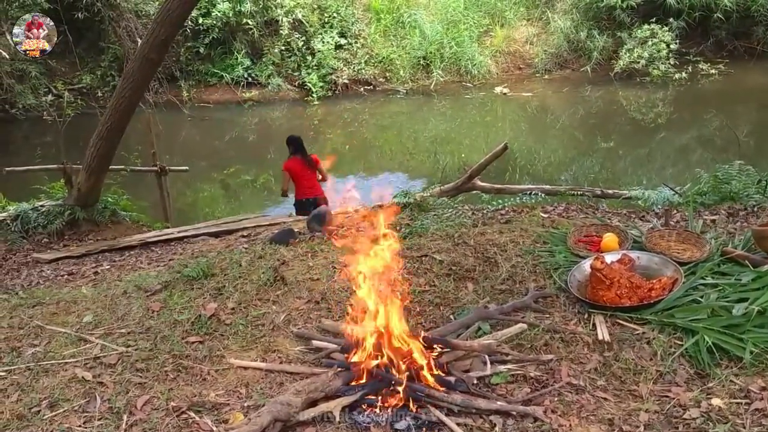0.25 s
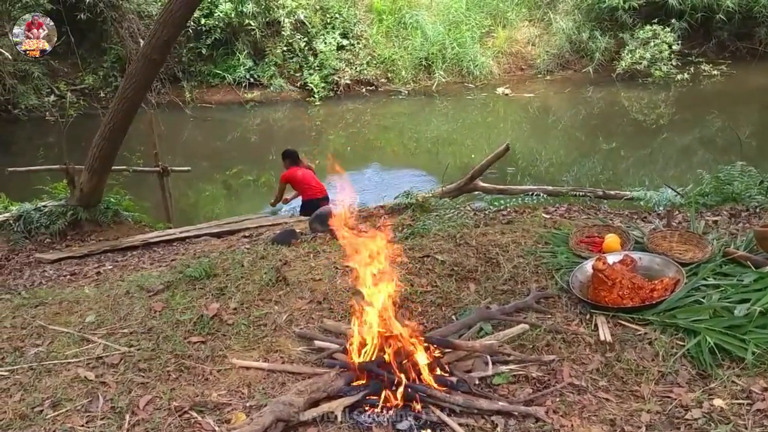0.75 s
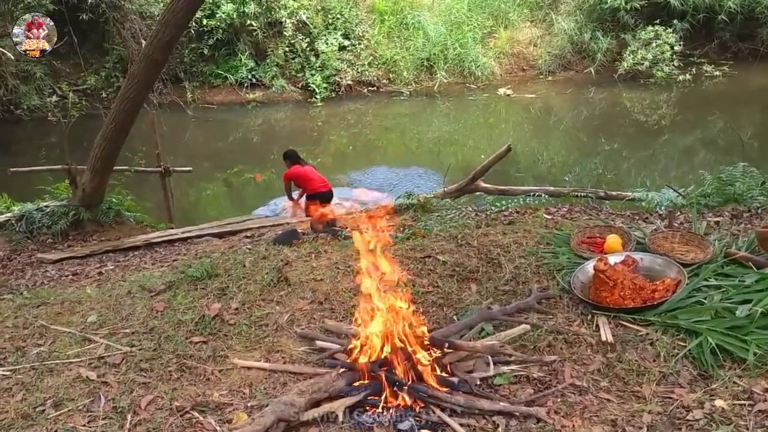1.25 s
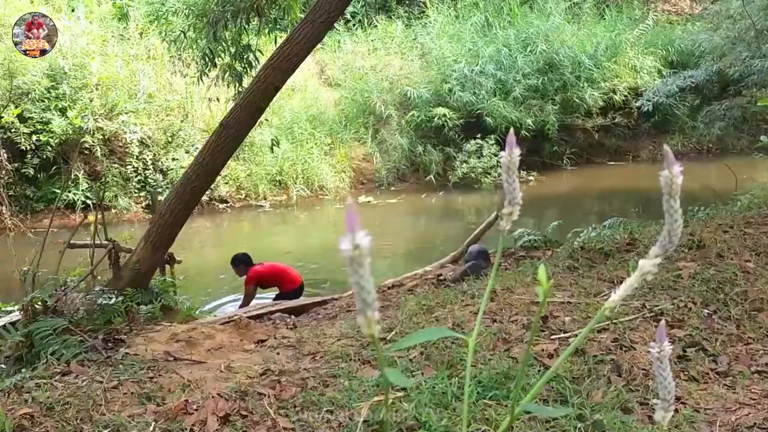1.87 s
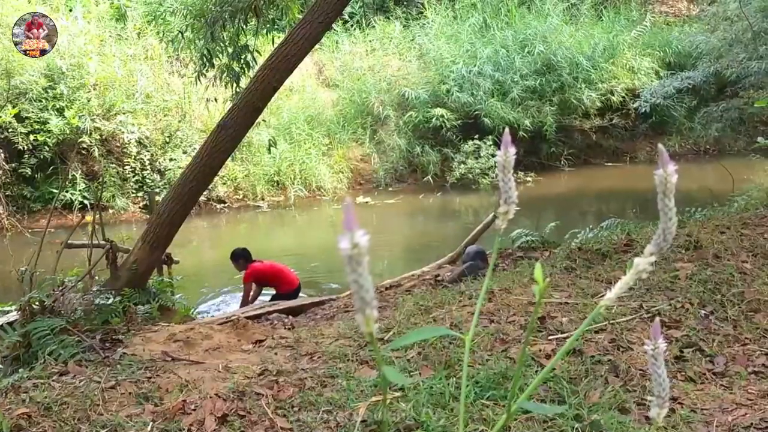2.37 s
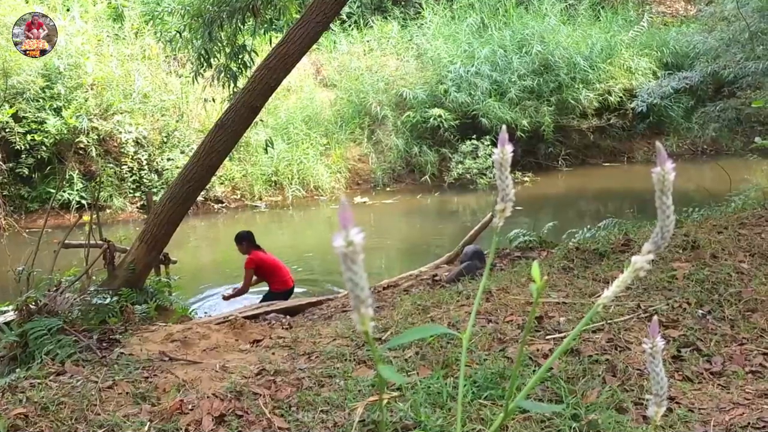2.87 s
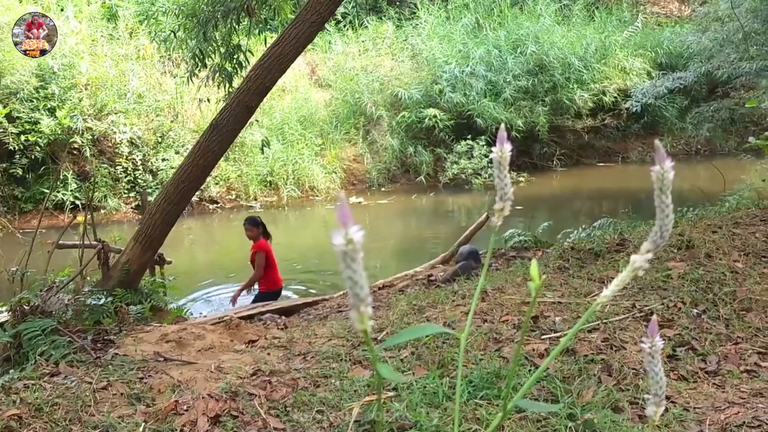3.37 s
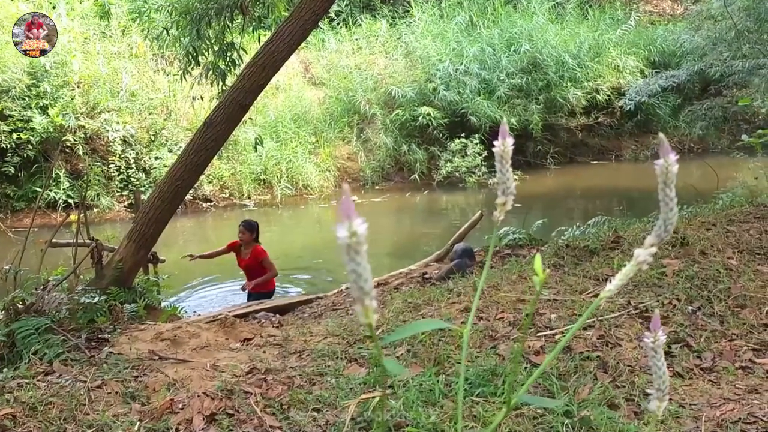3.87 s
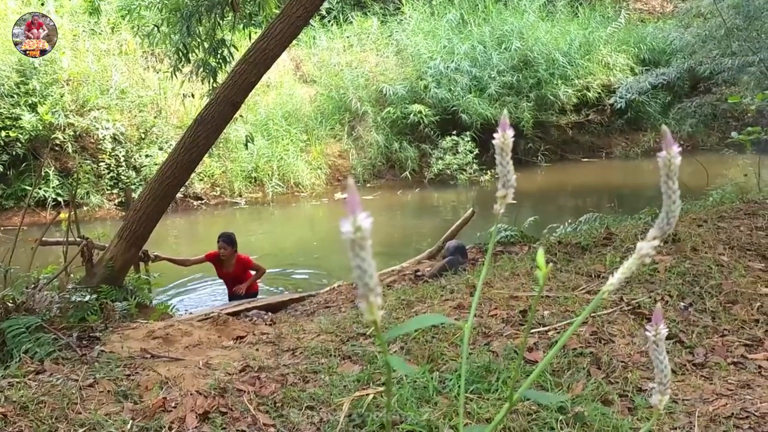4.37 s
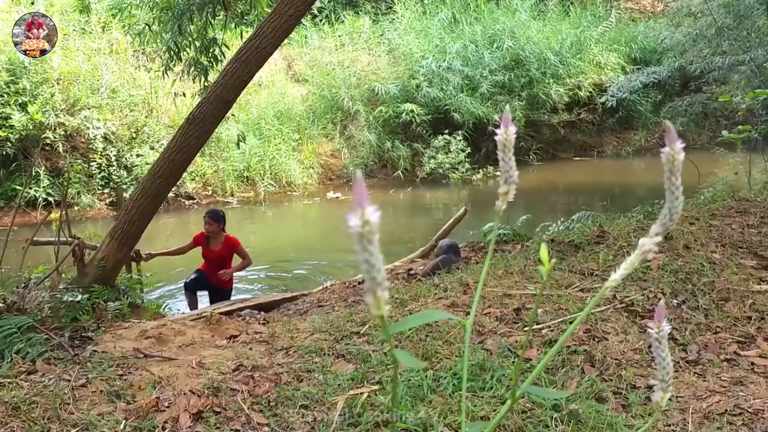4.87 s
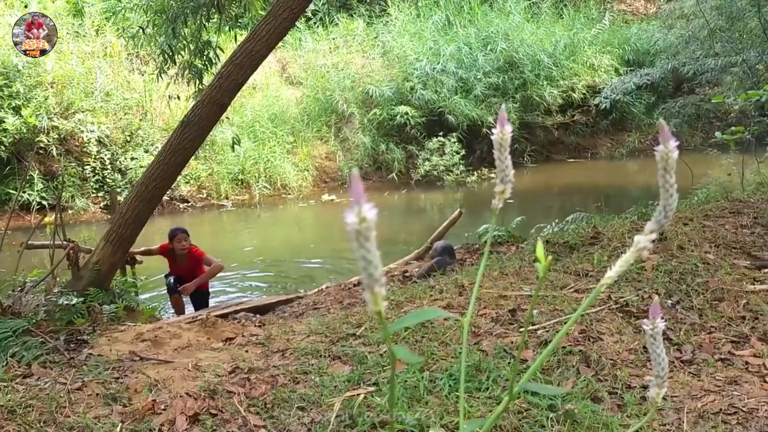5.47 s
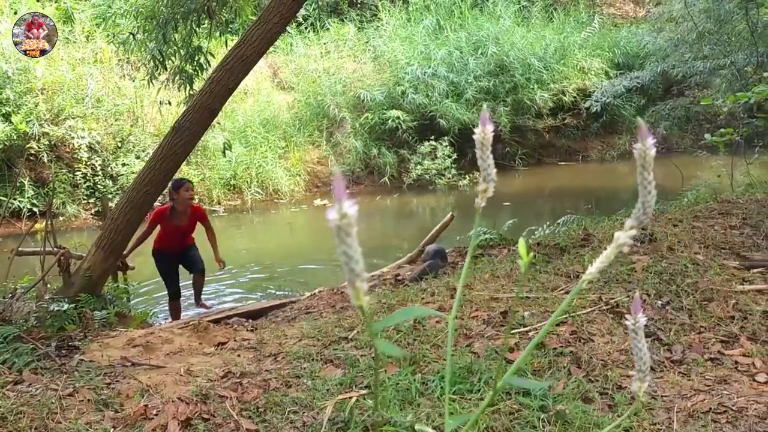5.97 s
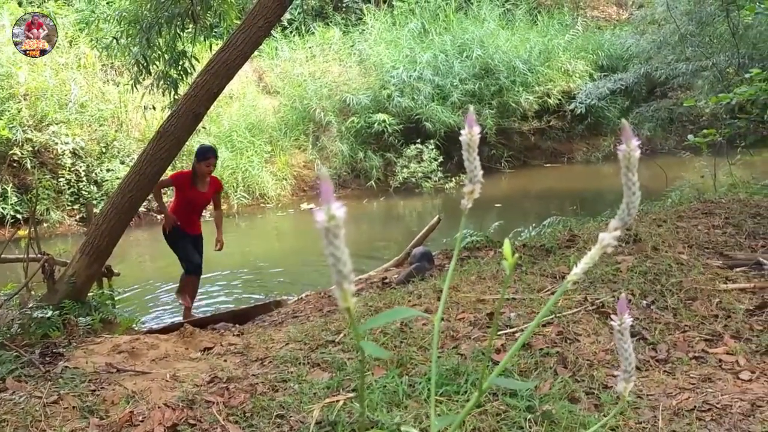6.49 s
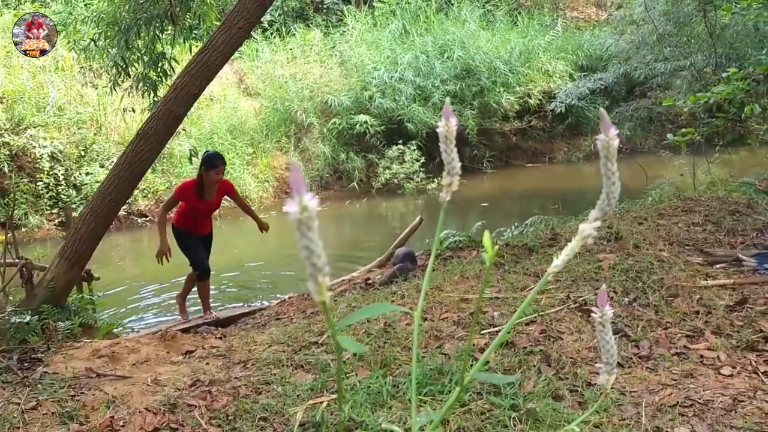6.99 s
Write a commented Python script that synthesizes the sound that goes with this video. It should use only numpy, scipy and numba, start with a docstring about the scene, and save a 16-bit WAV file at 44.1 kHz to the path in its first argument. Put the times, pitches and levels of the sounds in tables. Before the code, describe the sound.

A distant cicada whine over low fire rumble jumps to a dense, piercing insect chorus by a stream, with faint wading and bird chirps.

```python
"""In the trees above a forest stream a cicada chorus shrills: first far off beside a rumbling campfire,
then close on the bank. Noise and click trains ringing in tymbal resonances make the singers.
Someone wades in the shallows: swishes and sloshes of noise, plops and drops of ringing bubbles,
soft thuds and a creaking log of dying tones. Patchy low noise is the fire, then wind at the microphone ports;
a bird chirps, a hum comes and goes and the stream babbles faintly."""
import sys
import numpy as np
from scipy import signal
from scipy.fft import rfft, irfft, next_fast_len
from scipy.io import wavfile
from scipy.ndimage import uniform_filter1d
from numba import njit

SR = 44100
rng = np.random.default_rng(int(sys.argv[2]) if len(sys.argv) > 2 else 0)


def unload_audio(sound):
    """Save the sound as a 16-bit wav file, at the path given as the first command line argument."""
    columns = np.transpose(np.atleast_2d(sound))
    # keep every value between -1 and 1, then stretch to whole-number steps
    steps = np.round(np.clip(columns, -1, 1) * 32767)
    wavfile.write(sys.argv[1], SR, steps.astype(np.int16))


N = 318843
TIME = np.arange(N) / SR
MOVE_S = (1.9, 2.09)   # the listener goes from fire to bank

# Level of the blended mass. Each row: time in seconds, level in dB.
MASS_LEVEL = [(0.0, -52.5), (0.12, -66), (0.3, -70), (0.34, -58.5), (1.93, -57.5), (2.25, -43), (3.6, -42),
              (6.7, -40.5), (7.23, -41.5)]
# Tone of the mass heard from the fire. Each row: frequency in Hz, relative level in dB per Hz.
MASS_FAR = [(1760, -54), (3000, -30), (3760, -28.5), (4600, -19.5), (5200, -16), (5750, -23), (6300, -13),
            (6750, -15), (7350, -8.5), (8400, -16.5), (8650, -24.5), (10500, -35), (13600, -81),
            (22000, -120)]
# Tone of the mass heard from the bank. Each row: frequency in Hz, relative level in dB per Hz.
MASS_NEAR = [(1760, -63), (3000, -36.5), (3300, -31.5), (3800, -23), (4590, -7), (5400, -2), (6250, -2),
             (7510, -2), (7950, -1.5), (10000, -26.5), (10500, -47), (13600, -74), (22000, -120)]
CLICK_SHARE, MASS_UNSTEADY = 0.5, .003   # power share of audible click trains; spread of their rate as a share


def blended_mass():
    """Countless singers merge into noise, with a few click trains still heard in it."""
    white = rng.standard_normal((2, 2, N))
    rates = rng.uniform(380, 470, size=4)   # clicks per s
    trains = sum(tymbal_clicks(np.full(N, per_s), MASS_UNSTEADY) for per_s in rates)
    voices = np.sqrt(1 - CLICK_SHARE) * white + np.sqrt(CLICK_SHARE) * rms_one(forest(trains))
    near = during_move([0, 1])
    mass = np.sqrt(1 - near) * coloured(voices[0], MASS_FAR)
    mass = mass + np.sqrt(near) * coloured(voices[1], MASS_NEAR)
    return pan(mass * from_db(level_curve(MASS_LEVEL) + 0.47 * drift(2.7)), 0.66)


# Tone of the chorus overtones. Each row: frequency in Hz, relative level in dB per Hz.
OVERTONES = [(5290, -30), (9000, -12.5), (10300, -21.5), (12000, -13), (15100, -15), (15800, -8.5)]
OVERTONE_DB, OVERTONE_SWELL_DB_PER_S = (-71.5, -62.5), 0.57   # at the fire, on reaching the bank; then growing


def overtones():
    """The fizz on top of the chorus: flickering noise that keeps swelling on the bank."""
    on_bank_s = np.maximum(TIME - MOVE_S[1], 0)
    level_db = during_move(OVERTONE_DB) + OVERTONE_SWELL_DB_PER_S * on_bank_s
    fizz = coloured(rng.standard_normal((2, N)), OVERTONES)
    return pan(fizz * from_db(level_db + 1.4 * drift(30)), 1.0)


PHRASE_RISE_DB_PER_S, PHRASE_FALL_DB_PER_S, PHRASE_PAN_DB = 40, 35, 1   # slopes of a phrase one second long
TYMBAL_WIDTH_HZ = 350
# Phrases of small groups that stand out near the bank. Each row: start in seconds, length in seconds,
# level in dB, tymbal resonance in Hz at the start, tymbal resonance in Hz at the end.
PHRASES = [(1.98, .55, -50, 6480, 6150), (1.98, .4, -52, 5850, 5900), (2.1, .9, -54, 4830, 4720),
           (2.2, 1.0, -54, 5350, 5300), (2.47, .5, -47, 5900, 5770), (2.05, 1.6, -50.5, 7250, 7340),
           (2.2, 1.3, -54, 7700, 7700), (2.75, .65, -49.5, 6800, 6570), (3.05, .45, -51, 5740, 5500),
           (3.3, .5, -52, 6400, 6100), (3.55, .95, -49, 6750, 6540), (3.8, .12, -47, 5360, 5320),
           (3.8, .12, -53, 4460, 4450), (3.9, 1.1, -46, 7470, 7500), (3.95, .6, -55, 8350, 8300),
           (4.1, .7, -50.5, 5270, 5220), (4.6, 1.0, -49.5, 6560, 6720), (4.6, 2.3, -49, 7680, 7800),
           (4.8, .9, -49.5, 5600, 5750), (5.2, 2.1, -53, 4800, 4680), (5.1, 1.0, -49, 7500, 7530),
           (5.1, 1.2, -56, 8300, 8350), (5.4, 1.9, -49, 5520, 5480), (5.7, 1.6, -48.5, 6800, 7050),
           (6.2, 1.1, -49, 5780, 6100)]


def groups():
    """Small groups take turns to stand out of the mass, once the listener is near."""
    return during_move([0, 1]) * pan(sum(group(*row) for row in PHRASES), PHRASE_PAN_DB)


def group(start, length, db, from_hz, to_hz):
    """Three singers share a gliding pitch, and each one's own click rate follows it."""
    crisp = 1 / np.sqrt(length)   # short phrases have crisp ends
    level_db = held(start, length, db, PHRASE_RISE_DB_PER_S * crisp, PHRASE_FALL_DB_PER_S * crisp)
    heard = level_db > db - 20
    hz = np.interp(TIME[heard], [start, start + length], [from_hz, to_hz])
    rates = rng.uniform(430, 465, size=3)   # clicks per s
    rates[0] = hz.mean() / np.round(hz.mean() / rates[0])   # the leader's clicks fall in step with the ringing
    clicks = sum(tymbal_clicks(per_s * hz / hz.mean(), unsteady=.003) for per_s in rates)
    out = np.zeros((2, N))
    out[:, heard] = sung(clicks, hz, TYMBAL_WIDTH_HZ) * from_db(level_db + 0.74 * drift(6.3))[heard]
    return out


SINGER_RISE_DB_PER_S, SINGER_FALL_DB_PER_S, SETTLE_S = 400, 150, .2
STEADY_SPREAD, STRIKE_UNSTEADY = 0.00201, .2   # rate spread as a share; extra spread per share sharp
PARTNER_RATE, PARTNER_DB = 1.014, -9   # a neighbour of the lone singer, a little faster and fainter
# A lone singer that strikes up sharp and settles. One row: start in seconds, length in seconds,
# level in dB, settled rate in clicks per second, share sharp at first.
SINGER = (0.332, 1.72, -53.5, 393.8, .06)
# Resonances of the singer's body. Each row: settled frequency in Hz, width in Hz, relative level in dB,
# pan in dB, extra dB when striking up, swell in dB per second.
TYMBAL = [(4335, 98, -10, .5, -14, -1), (5110, 300, -2, -.5, -8, 2.5), (5380, 320, -10, 3, 10, -1),
          (6180, 450, -4, 10, 6, -1), (6690, 260, -10, 8, 0, 0), (7210, 300, 3, 7.5, 3, 0),
          (7920, 540, -1.5, 10, -10, 1.5)]


def singer(start, length, top_db, per_s, sharp):
    """One click train, joined by a neighbour's, sounds every resonance of the body."""
    level_db = held(start, length, top_db, SINGER_RISE_DB_PER_S, SINGER_FALL_DB_PER_S)
    heard = (TIME > start - .3) & (TIME < start + length + .3)   # opens early, so the echoes are built up
    since_start = TIME[heard] - start
    fresh = np.exp(-np.maximum(since_start, 0) / SETTLE_S)
    pitch = 1 + sharp * fresh
    unsteady = STEADY_SPREAD + STRIKE_UNSTEADY * (pitch - 1)   # the sharper, the less steady
    clicks = tymbal_clicks(per_s * pitch, unsteady)
    clicks += from_db(PARTNER_DB) * tymbal_clicks(PARTNER_RATE * per_s * pitch, unsteady)
    body = np.zeros((2, len(pitch)))
    for hz, width_hz, db, pan_db, strike_db, swell_db in TYMBAL:
        mode_db = db + strike_db * fresh + swell_db * since_start + 1.2 * drift(13.0)[heard]
        body += pan(from_db(mode_db) * sung(clicks, hz * pitch, width_hz), pan_db)
    out = np.zeros((2, N))
    out[:, heard] = from_db(level_db[heard]) * rms_one(body)
    return out


RIB_WAVER_DB = 3
# Three ribs buckle in turn, unequally: the relative level in dB of each rib.
RIB_DB = [-1.5, -17, -9]


def tymbal_clicks(per_s, unsteady):
    """Ribs buckle one after another at a nearly steady rate; each click lies between samples."""
    wander = 1 + unsteady * (drift(2) + drift(14))[:len(per_s)]
    turns = np.cumsum(per_s * wander / SR) + 3 * rng.random()
    click = np.arange(np.ceil(turns[8]), turns[-9])
    at = np.interp(click, turns, np.arange(len(turns)))
    near = np.round(at).astype(int)[:, None] + np.arange(-6, 7)
    rib = click.astype(int) % 3
    waver_db = RIB_WAVER_DB * drift(6)[near[:, 6]] * (rib - 1)   # outer ribs waver against each other
    size = from_db(np.array(RIB_DB)[rib] + waver_db) * (1 + 0.08 * rng.standard_normal(len(at)))
    out = np.zeros(len(turns))
    out[near] = size[:, None] * np.sinc(near - at[:, None]) * np.hanning(15)[1:-1]
    return out


def sung(clicks, hz, width_hz):
    """Clicks ring twice through a tymbal resonance and scatter; level evened to 1."""
    ringing = resonate(resonate(clicks, hz, width_hz, SR), hz, width_hz, SR)
    heard = forest(ringing)
    return heard / np.sqrt(uniform_filter1d(heard ** 2, size=SR // 4) + 1e-12)


FOREST_T60_S, DIRECT_DB = .45, 29   # echo decay to -60 dB; direct sound over a single early echo


def forest(x):
    """Direct sound, then scatter from trunks and leaves: a dense dying tail, unrelated left and right."""
    t = np.arange(int(FOREST_T60_S * SR)) / SR
    echoes = rng.standard_normal((2, len(t))) * from_db(-60 * t / FOREST_T60_S)
    echoes[[0, 1], rng.integers(0, 40, size=2)] = from_db(DIRECT_DB)
    return signal.fftconvolve(x[None], echoes, axes=1)[:, :len(x)]


CALM_SWISH_DB, CALM_SLOSH_DB = (-77, -83.5), (-76, -86)   # lapping between movements: at the fire, on the bank
WADE_RISE_DB_PER_S, WADE_FALL_DB_PER_S = 182, 113
# Movements in the water. Each row: start in seconds, length in seconds, swish level in dB, slosh level in dB.
WADES = [(0, 0.049, -56.5, -58), (0.113, 0.039, -79, -59), (0.176, 0.12, -61.5, -66),
         (0.866, 0.29, -70.5, -70.5), (2.055, 0.049, -64, -72), (2.18, 0.35, -67.5, -72.5),
         (2.575, 0.35, -68, -87), (3.005, 0.18, -70.5, -74.5), (3.266, 0.19, -73.5, -80),
         (3.98, 0.013, -76, -103), (4.44, 0.32, -77, -88), (4.72, 0.5, -66, -75), (5.682, 0.24, -76.5, -91)]


def wading_levels():
    """Levels in dB of swish and slosh: the powers of calm lapping and of every movement add up."""
    shape = np.array([from_db(2 * held(s, length, 0, WADE_RISE_DB_PER_S, WADE_FALL_DB_PER_S))
                      for s, length, *_ in WADES])
    calm_db = np.array([during_move(db) for db in (CALM_SWISH_DB, CALM_SLOSH_DB)])
    moves = from_db(2 * np.array(WADES)[:, 2:].T) @ shape
    return 10 * np.log10(from_db(2 * calm_db) + moves)


# Tone of the bright stirred water. Each row: frequency in Hz, relative level in dB per Hz.
SWISH = [(300, -21), (500, -9.5), (900, -5.5), (1600, -2.5), (3000, -6), (4500, -4), (7000, -14.5)]


def swish(level_db):
    """Stirred water hisses: bright patchy noise that follows the movements."""
    return pan(from_db(level_db) * patchy_noise(SWISH, patchy_db=1.88, rate=13), 1.0)


# Tone of the heavy moving water. Each row: frequency in Hz, relative level in dB per Hz.
SLOSH = [(120, -7.5), (200, -0.5), (300, -1.5), (450, -5.5), (600, -57)]


def slosh(level_db):
    """Heavier water heaves: low patchy noise that follows the movements."""
    return from_db(level_db) * patchy_noise(SLOSH, patchy_db=4.5, rate=8.6)


def droplets(swish_db):
    """Small bubbles of chance size ring a few cycles each in the stirred water."""
    sizes = from_db(3.15 * np.minimum(rng.exponential(1, (2, N)), 5))
    chance = 900 * from_db(5 * drift(8)) / SR   # wavers around 900 bubbles per s
    bubbles = sizes * (rng.random((2, N)) < chance) + 1e-18
    pitches, dealt = np.geomspace(550, 4200, 12), rng.integers(0, 12, (2, N))
    out = sum(signal.lfilter(*signal.iirpeak(hz, 8.0, fs=SR), bubbles * (dealt == k))
              for k, hz in enumerate(pitches))
    return from_db(swish_db - 6) * rms_one(out)


SPLASH_HZ, SPLASH_RISE_HZ_PER_S, SPLASH_FADE_DB_PER_S = 1350, 15000, 502
# A lifted hand drains. Each row: start in seconds, length in seconds, level in dB.
SPLASH = [(1.005, 0.039, -63)]


def splash():
    """Noise through a resonance that rises in pitch."""
    hz = np.clip(SPLASH_HZ + SPLASH_RISE_HZ_PER_S * (TIME - SPLASH[0][0]), 700, 2800)
    noise = np.array([rms_one(resonate(x, hz, 480.0, SR)) for x in rng.standard_normal((2, N))])
    return noise * from_db(held(*SPLASH[0], SPLASH_FADE_DB_PER_S))


# Plops of trapped air. Each row: start in seconds, level in dB before trim, pitch in Hz, pan in dB.
PLOPS = [(0.178, -49, 200, -2), (0.669, -54.5, 693, 10), (0.889, -55, 725, 10), (0.925, -56, 398, 4),
         (0.985, -44, 294, 1), (1.01, -54, 245, 3), (2.024, -54.5, 2106, -7), (2.232, -62, 788, 17),
         (2.398, -55.5, 428, 1), (2.478, -62, 204, 5), (2.788, -56.5, 880, 12), (2.995, -60, 438, 8),
         (3.44, -63.5, 1190, 8), (3.983, -64, 1190, 1), (4.221, -56.5, 287, 1), (4.449, -63.5, 585, 15),
         (4.501, -58, 273, -1.0)]


def plops():
    """Three bubbles of like size ring just after one another under a puff of spray."""
    out = np.zeros((2, N))
    spread = rng.normal(0, 0.148, (len(PLOPS), 3))
    for (s, db, hz, pan_db), sizes in zip(PLOPS, spread):
        for k, size in enumerate(sizes):
            bubble_hz = hz * (1 + size * (k > 0))
            bubble = ring(bubble_hz, .055 + 10 / hz, .008, .05)
            add(out, s + .008 * k, pan(from_db(db - 2 * k - 7) * bubble, pan_db))
        swell = ring(8, .05, .01, 0)[:, :2200]   # so slow a ring is a single soft hump
        spray = rng.standard_normal((2, 2200)) * swell
        band = signal.butter(2, [0.96 * hz, 1.32 * hz], "band", fs=SR, output="sos")
        add(out, s, from_db(db + 10.5) * signal.sosfilt(band, spray))
    return right_late(out)


THUD_TURN = 1.17   # radians between left and right
THUD_PUFF_DB, THUD_PUFF_REACH = -13, 3.14   # dull noise of the contact, up to this multiple of the pitch
# Soft thuds of feet on log and bank. Each row: start in seconds, level in dB, pitch in Hz,
# decay to -60 dB in seconds, pan in dB.
THUDS = [(.004, -44, 199.6, 0.23, 1), (.098, -51, 246.6, 0.35, 2), (3.148, -47.5, 81.5, 0.1, -1),
         (4.311, -46, 113, 0.11, -4), (6.27, -50.5, 83.7, 0.2, -1), (6.26, -63, 198, 0.05, -1),
         (6.932, -44.5, 66.4, 0.033, -1), (6.944, -50.5, 270, 0.16, 1), (6.97, -40, 156, 0.068, -2)]


def thuds():
    """The struck body rings in a main mode and two weaker upper ones, with a dull puff of contact noise."""
    out = np.zeros((2, N))
    modes = [(1, 0.85, 0.0057), (2.3, 0.13, 0.0051), (3.7, 0.034, 0.0052)]   # (pitch ratio, gain, rise s)
    t = TIME[:4000]
    for s, db, hz, t60, pan_db in THUDS:
        for ratio, gain, rise_s in modes:
            tone = ring(ratio * hz, t60 / np.sqrt(ratio), rise_s, 0, THUD_TURN)
            add(out, s, pan(gain * from_db(db) * tone, pan_db))
        dull = signal.butter(4, THUD_PUFF_REACH * hz, fs=SR, output="sos")
        puff = rms_one(signal.sosfilt(dull, rng.standard_normal(4000)))
        shape = from_db(db + THUD_PUFF_DB - 60 * t / t60) * np.minimum(t / .006, 1)
        add(out, s, pan(shape * puff, pan_db))
    return out


# Slips of the creaking log. Each row: start in seconds, level in dB, pitch in Hz.
CREAK = [(4.772, -56, 340), (4.806, -51, 314), (4.842, -58, 334), (4.873, -55, 342), (4.914, -54.5, 440),
         (4.948, -61, 235), (4.97, -63, 228)]


def creak():
    """The log sticks and slips: every slip rings briefly."""
    out = np.zeros((2, N))
    for s, db, hz in CREAK:
        add(out, s, from_db(db) * ring(hz, 0.11, 0.0022, 0.013))
    return right_late(out)


# Chirps of a small bird. Each row: start in seconds, level in dB, pitch in Hz, pan in dB.
CHIRPS = [(5.12, -63, 3180, 10), (5.189, -60, 3200, 16), (5.74, -64, 3150, 3), (5.811, -58.5, 3170, 1),
          (6.806, -56, 3170, 5.5)]


def chirps():
    """Short falling tones, each with four fainter echoes slightly off in pitch."""
    out = np.zeros((2, N))
    for s, db, hz, pan_db in CHIRPS:
        for late_s, echo_db in [(0, 0), (.009, -5), (.021, -7), (.034, -10), (.05, -12)]:
            tone = ring(hz * rng.normal(1, .015), .03, .012, -.06)
            add(out, s + late_s, pan(from_db(db + echo_db) * tone, pan_db))
    return right_late(out)


FIRE_DB, BURST_DB, BURST_S = -59, 33, 0.031   # steady roar; extra dB of a loud burst that dies away at the start
# Tone of the fire's rumble. Each row: frequency in Hz, relative level in dB per Hz.
FIRE = [(12, -4.5), (20, -17), (43, 0), (70, -1), (99, -3.5), (172, -16), (300, -28), (390, -28.5),
        (660, -120)]


def campfire():
    """The fire roars as low noise, under a loud burst that dies away at the start."""
    level_db = FIRE_DB + BURST_DB * np.exp(-TIME / BURST_S)
    return from_db(level_db) * patchy_noise(FIRE, patchy_db=0.3, rate=24)


# Tone of the wind on the bank. Each row: frequency in Hz, relative level in dB per Hz.
WIND = [(12, -47), (20, 0), (48, 5.5), (134, -6), (300, -19.5), (390, -49), (660, -120)]
# Gusts on the bank. Each row: time in seconds, level in dB.
GUSTS = [(2.1, -67), (2.37, -77.5), (3.1, -70.5), (4.05, -77.5), (4.45, -71), (4.75, -78), (5.2, -79),
         (5.28, -94), (5.4, -74), (5.5, -74), (6.4, -70.5), (6.8, -81), (7.0, -61), (7.1, -100)]


def wind():
    """Eddies at the microphone ports: low patchy noise that follows the gusts."""
    return from_db(level_curve(GUSTS)) * patchy_noise(WIND, patchy_db=1.5, rate=4.4)


def rumble():
    """Fire gives way to wind; the right side is turned in phase, more so in the wind eddies."""
    near = np.interp(TIME, (2.1, 2.2), [0, 1])
    out = (1 - near) * campfire() + near * wind()
    turn = np.exp(1j * during_move((0.46, 1)))   # radians: fire, then wind
    out[1] = (signal.hilbert(out[1], next_fast_len(N))[:N] * turn).real
    return out


DRONE_HZ, DRONE_FADE_DB_PER_S = 33.5, 119
# A faint hum comes and goes. Each row: start in seconds, length in seconds, level in dB.
DRONE = [(3.2, 0.97, -83.5), (5.377, 0.22, -85.5)]
# Make-up of the hum. Each row: multiple of the base rate, relative level in dB.
DRONE_ORDERS = [(4, -4), (5, 1), (6, 5), (7, -6)]


def drone():
    """A few multiples of a low, slightly wavering rate."""
    turns = np.cumsum(DRONE_HZ * (1 + 0.009 * drift(5))) / SR
    tone = np.zeros((2, N))
    for k, db in DRONE_ORDERS:
        tone += from_db(db + 2.2 * drift(5)) * np.sin(2 * np.pi * (k * turns + rng.random((2, 1))))
    return tone * sum(from_db(held(*row, DRONE_FADE_DB_PER_S)) for row in DRONE)


STREAM_DB = -79
# Tone of the far babble. Each row: frequency in Hz, relative level in dB per Hz.
STREAM = [(400, -10), (1000, -11), (2000, -2), (3500, -0.5), (4500, -8.5)]


def stream():
    """Far water babbles unevenly: noise whose level wanders."""
    return from_db(STREAM_DB + 4.9 * drift(8.6)) * coloured(rng.standard_normal((2, N)), STREAM)


# Likeness of left and right. Each row: frequency in Hz, correlation from 0 to 1.
LIKENESS = [(60, 1), (130, 0.7), (290, 0.048), (700, 0.022)]


def patchy_noise(spectrum, patchy_db, rate):
    """Stereo noise in half-octave bands that flicker partly together, alike in the bass; rms 1."""
    size, together, out = next_fast_len(N), drift(rate / 3), 0
    mid, side = rfft(rng.standard_normal((2, size)))
    hz = np.arange(len(mid)) * SR / size + 1e-3
    alike = at_hz(LIKENESS, hz)
    pair = irfft(np.sqrt(1 + alike) * mid + np.sqrt(1 - alike) * side * [[1], [-1]], size)[:, :N]
    pair = coloured(pair, spectrum)
    octaves = np.log2(spectrum[-1][0] / spectrum[0][0])
    for low in spectrum[0][0] * 2 ** np.arange(0, octaves, .5):
        band_filter = signal.butter(2, [low, low * np.sqrt(2)], "band", fs=SR, output="sos")
        out = out + signal.sosfilt(band_filter, pair) * from_db(patchy_db * (together + drift(rate)))
    return rms_one(out)


def coloured(x, spectrum):
    """Shaped by a spectrum, silent outside it; rms 1."""
    size = next_fast_len(N)
    hz = np.arange(size // 2 + 1) * SR / size + 1e-3
    inside = (hz > spectrum[0][0]) & (hz < spectrum[-1][0])
    return rms_one(irfft(rfft(x, size) * from_db(at_hz(spectrum, hz)) * inside, size)[..., :N])


@njit
def resonate(x, hz, width_hz, sr):
    """A resonance whose centre moves."""
    out, r = np.zeros_like(x), np.exp(-np.pi * width_hz / sr)
    for i in range(2, len(x)):
        feedback = 2 * r * np.cos(2 * np.pi * hz[i] / sr) * out[i - 1] - r * r * out[i - 2]
        out[i] = x[i] - x[i - 2] + feedback
    return out


def ring(hz, t60, rise_s, glide, turn=0):
    """A tone that swells, dies and glides in pitch, turned in phase between left and right; top near 1."""
    t = np.arange(int(1.5 * t60 * SR)) / SR
    shape = (1 - np.exp(-(t / rise_s) ** 2)) * from_db(-60 * t / t60)
    phase = 2 * np.pi * hz * (t + glide * t * t / t60) + np.array([[0], [turn]])
    return shape / shape.max() * np.sin(phase)


def drift(rate):
    """Slow smooth chance, spread 1; a higher rate in Hz wanders faster."""
    r = np.exp(-80 * np.pi * rate / SR)   # drawn once in 40 samples
    slow = signal.lfilter([1], [1, -2 * r, r * r], rng.standard_normal(N // 40 + 2002))[2000:]
    return np.interp(np.arange(N) / 40, np.arange(len(slow)), rms_one(slow))


def held(start, length, db, rise_db_per_s, fall_db_per_s=None):
    """Level in dB that climbs to its start, holds, then falls away."""
    fall_db_per_s = fall_db_per_s or rise_db_per_s
    before, after = np.maximum(start - TIME, 0), np.maximum(TIME - start - length, 0)
    return db - rise_db_per_s * before - fall_db_per_s * after


def during_move(values):
    """Goes from the value at the fire to the value on the bank."""
    return np.interp(TIME, MOVE_S, values)


def level_curve(rows):
    """A drawn level read at every sample."""
    seconds, db = np.transpose(rows)
    return np.interp(TIME, seconds, db)


def at_hz(points, hz):
    """A spectrum read on a log-frequency axis."""
    point_hz, values = np.transpose(points)
    return np.interp(np.log(hz), np.log(point_hz), values)


def from_db(db):
    """Gain of a level."""
    return 10 ** (np.asarray(db) / 20)


def rms_one(x):
    """Scaled to rms 1."""
    return x / np.sqrt(np.mean(x ** 2) + 1e-20)


def pan(x, pan_db):
    """Level offset of left over right."""
    return x * from_db(np.array([pan_db / 2, -pan_db / 2]).reshape(2, -1))


def right_late(x):
    """The sound reaches the right side 0.8 ms after the left."""
    x[1] = np.roll(x[1], round(.0008 * SR))
    return x


def add(out, s, sound):
    """Mixes a short stereo sound in at a time."""
    at = round(s * SR)
    out[:, at:at + sound.shape[1]] += sound[:, :N - at]


def scene():
    """Chorus in front, then water, small events, rumble, hum and stream."""
    swish_db, slosh_db = wading_levels()
    chorus = blended_mass() + overtones() + groups() + singer(*SINGER)
    water = swish(swish_db) + slosh(slosh_db) + droplets(swish_db) + splash() + plops()
    small_events = thuds() + creak() + chirps()
    return chorus + water + small_events + rumble() + drone() + stream()


CUTOFF_HZ = 15740


def record(dry):
    """A steep low-pass cuts the top."""
    return signal.sosfilt(signal.ellip(14, .3, 70, CUTOFF_HZ, fs=SR, output="sos"), dry)


dry = scene()
out = record(dry)
unload_audio(out)
```